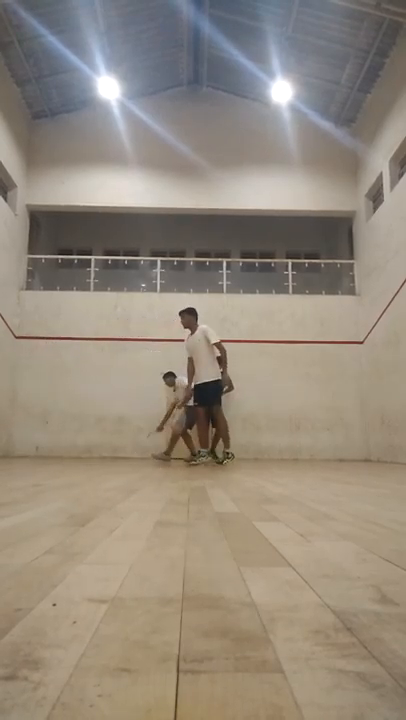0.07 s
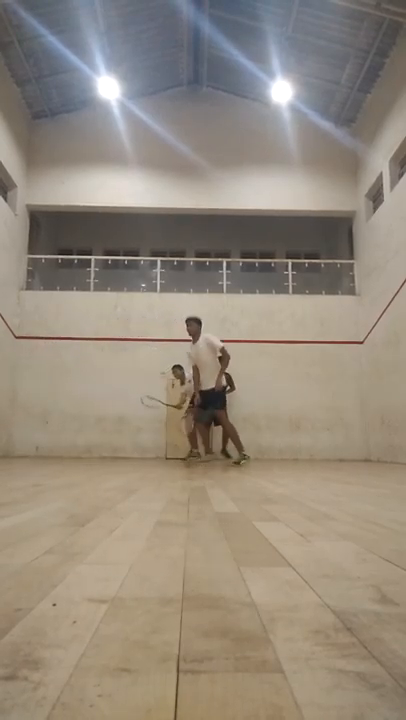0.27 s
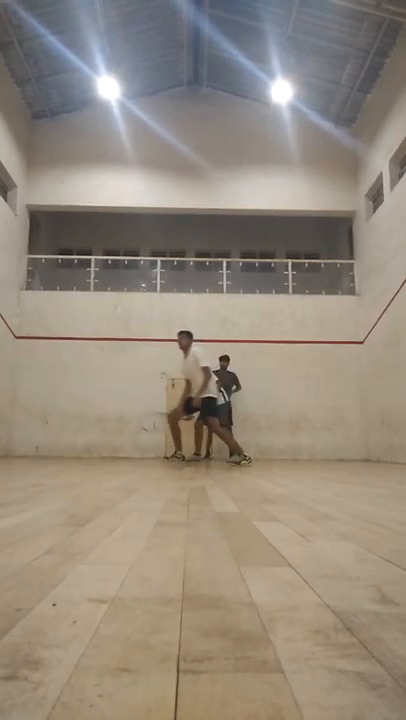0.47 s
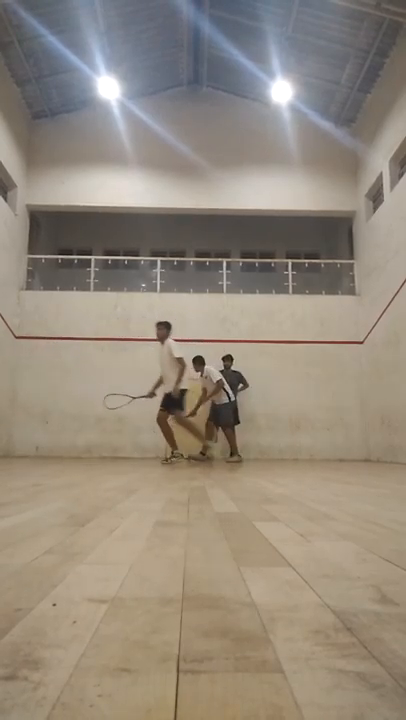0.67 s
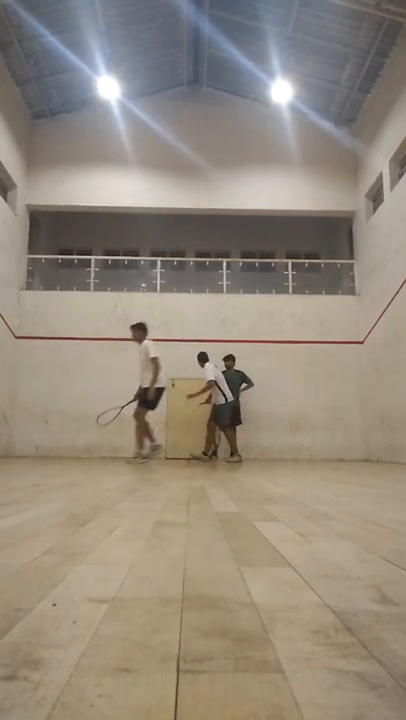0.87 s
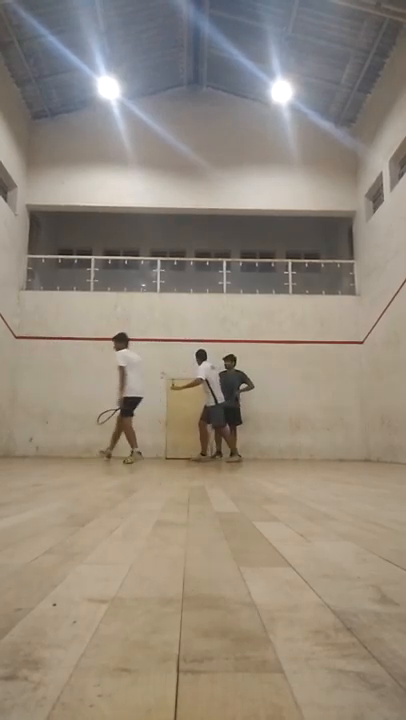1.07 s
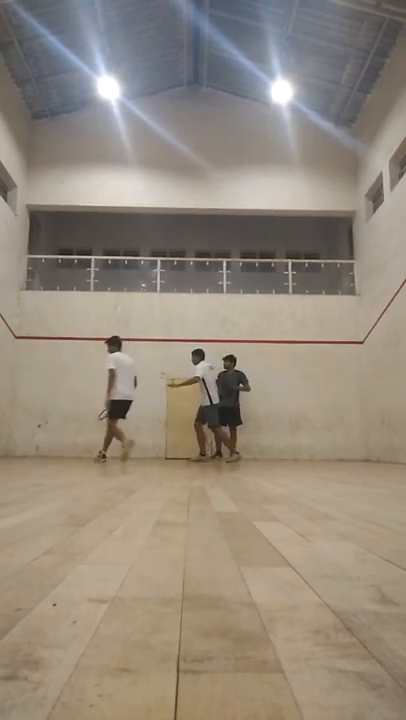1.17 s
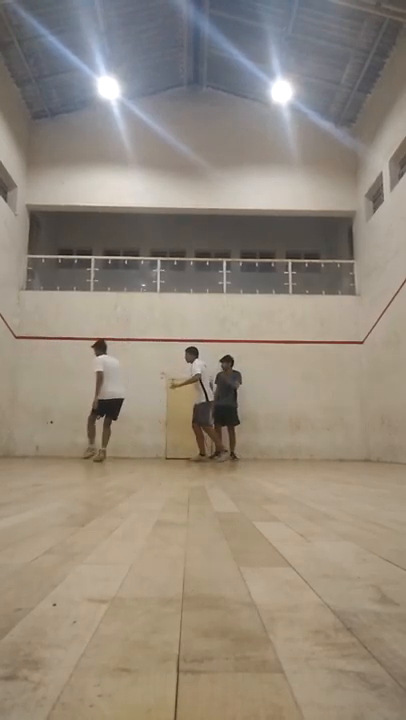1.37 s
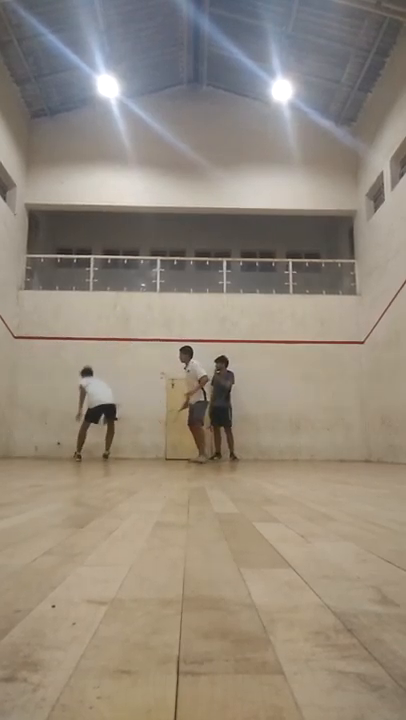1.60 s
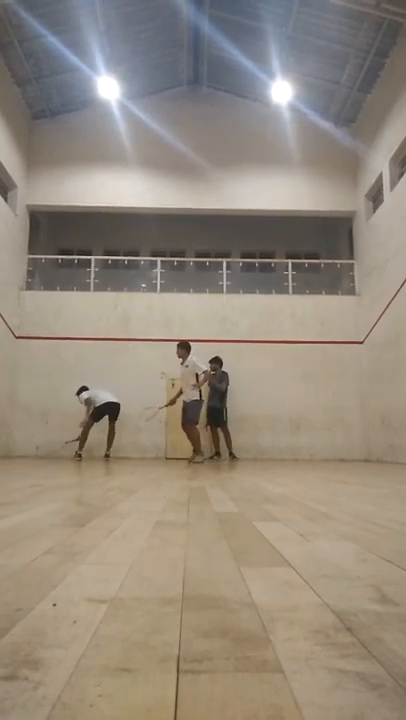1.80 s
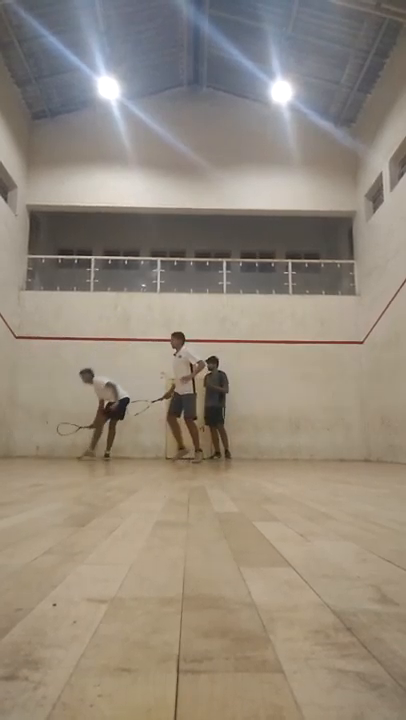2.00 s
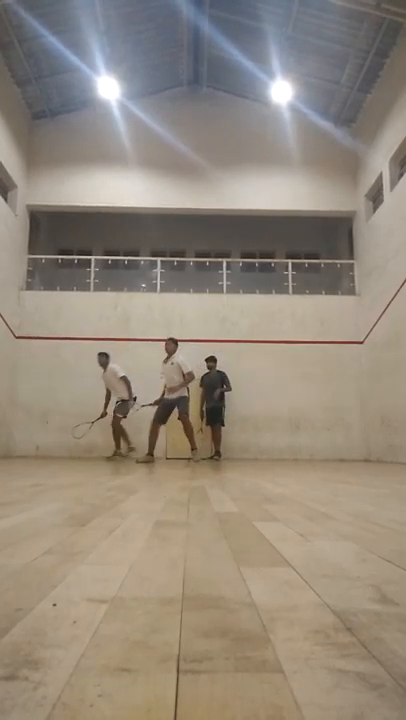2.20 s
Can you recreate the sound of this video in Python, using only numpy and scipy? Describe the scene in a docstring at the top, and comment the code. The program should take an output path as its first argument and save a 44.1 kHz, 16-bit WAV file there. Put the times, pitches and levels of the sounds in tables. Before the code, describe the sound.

A squash ball hitting a wall dominates, heard from floor level in a bare indoor court. At 0.2 seconds a distant racket strikes faintly; at 0.45 the ball slams the near wall, leaving a hollow echo for over a second. Soft, low footfalls thud on wooden boards from 0.8 seconds. Around 2 seconds a racket lightly taps, scrapes and knocks on the floor, with one sharp tick.

```python
"""A distant racket strikes a squash ball over the faint, dying echo of the previous shot.
The ball slams the near wall, flutters briefly and fills the bare, hard-walled court with a long echo.
The court rings hollow while the gain control ducks and recovers. Feet thud and scuff on sprung boards,
then a racket taps, scrapes and knocks on the floor. All is heard from floor level by the front wall."""
import sys
import numpy as np
from scipy import signal
from scipy.fft import rfft, irfft
from scipy.io import wavfile
from scipy.ndimage import uniform_filter1d

SR = 44100
rng = np.random.default_rng(int(sys.argv[2]) if len(sys.argv) > 2 else 0)


def wrap_up_sound(samples):
    """Save the sound to the file named by the first command line argument, as 16-bit audio."""
    columns = np.atleast_2d(samples).T
    # keep every value between -1 and 1, then stretch to whole-number steps
    tamed = np.clip(columns, -1, 1)
    steps = np.round(tamed * 32767).astype(np.int16)
    wavfile.write(sys.argv[1], SR, steps)


N = 99225
T = np.arange(N) / SR
HZ = np.maximum(np.arange(N // 2 + 1) * SR / N, 1)

# ball and wall at contact: f/Hz, t60/s, left level/dB, right level/dB
BALL_MODES = [(195, 0.027, -1.5, -15.5), (399, 0.011, -5.5, 10.5), (734, 0.014, -14.5, 10.5),
              (1303, 0.0096, -8.5, 8), (2350, 0.0071, -19, 1.5)]
# first returns off side walls, ceiling and rear wall (the strong one at 0.486 s): t/s, level/dB
EARLY_RETURNS = [(0.4657, -22.5), (0.468, -11.5), (0.4795, -17), (0.4863, -3.5), (0.49, -18), (0.505, -14),
                 (0.521, -13.5)]
# dull rebounds off side wall and floor: t/s, f/Hz, half-width/Hz, level/dB
REBOUNDS = [(.502, 560, 190, -15.5), (.547, 750, 201, -27), (0.569, 616, 228, -11.5)]
# swells of string and frame ring: t/s, f/Hz, half-width/Hz, level/dB, t60/s
STRING_SWELLS = [(.222, 393, 13.3, -29.5, 0.64), (.222, 1144, 33, -42.5, 1.0),
                 (.252, 1770, 21, -44.5, 0.45), (0.289, 1738, 38, -34.5, 0.5), (.317, 388, 25, -25.5, 0.26)]
# footfalls on sprung boards: t/s, f/Hz, level/dB, t60/s
FOOTFALLS = [(0.758, 66.3, -37, 0.55), (0.921, 148.3, -37, 0.95), (1.165, 85, -48, 0.59),
             (1.199, 193, -39, 0.51), (1.291, 129, -44, 0.48), (1.76, 96.4, -32.5, 0.3),
             (1.79, 231, -44.5, 0.4), (1.813, 134, -32, 0.17), (1.865, 76, -30.5, 0.24),
             (1.945, 70, -36, 0.19), (2.036, 85.4, -46, 0.4)]
# a faint shoe scuff, then the racket dragged on the floor: t/s, level/dB
SCRAPES = [(1.772, -67), (1.972, -42), (1.996, -42.5), (2.085, -43)]
# racket and ball knocking on the boards: t/s, level/dB
KNOCKS = [(2.033, -37), (2.085, -39)]

# spectral shapes of the contacts: f/Hz, relative level/dB
CRACK_SPECTRUM = [(60, -12), (300, 13), (1500, -9.5), (2600, -4), (4000, -9), (6500, 1), (8000, -12),
                  (12000, -41)]
SLAM_SPECTRUM = [(29, -59.5), (50, -8), (87, -22.5), (222, -9), (296, -3.5), (572, -3.5), (813, -1),
                 (1080, -21.5), (1440, -10.5), (1570, -14), (2040, -11), (2330, -14.5), (2780, -13.5),
                 (4410, -17), (5610, -15.5), (6830, -19), (7970, -53), (8700, -33.5), (9500, -44),
                 (12400, -93), (20900, -120)]
RACKET_SPECTRUM = [(60, -26), (110, -43), (180, -7.5), (300, -2.5), (400, -3.5), (540, -29.5), (700, -11.5),
                   (800, -11), (1000, -12), (1150, -6), (1380, -28), (1750, -25), (2050, -31),
                   (2450, -25.5), (3100, -28), (5600, -23.5), (7000, -31.5), (8000, -46.5), (9500, -52)]
SCRAPE_SPECTRUM = [(200, 7.5), (600, -0.5), (1100, -4), (1600, -11.5), (3000, -3), (4300, -4), (5500, 2),
                   (6700, 0), (8000, -22), (9500, -22)]
KNOCK_SPECTRUM = [(80, -45), (160, -16), (215, 1.5), (370, -2.5), (520, -25), (800, -54), (1100, -12.5),
                  (1400, -28), (4000, -47)]
TICK_SPECTRUM = [(300, -14), (1500, -11), (3000, -5), (6800, 1), (8000, -16), (12000, -30)]
# spectral shapes of the hall's hush and the previous shot's echo: f/Hz, relative level/dB
HUSH_SPECTRUM = [(30, -15.5), (70, -5), (110, -3.5), (220, -2.5), (450, -16), (800, -12.5), (1100, -10.5),
                 (2200, -13.5), (3200, -19.5), (4200, -26), (6100, -33), (7200, -43), (9000, -67.5)]
LAST_ECHO_SPECTRUM = [(100, -6.5), (600, 5.5), (1500, -0.5), (2500, -5), (4000, -6.5), (6300, 2),
                      (8000, -26.5)]

# court reverberation: f/Hz, t60/s
COURT_T60 = [(60, 0.45), (150, 0.97), (300, 0.94), (500, 1.414), (800, 1.407), (1800, 1.73), (3200, 1.32),
             (5500, 1.097), (9000, 0.8)]
# left-right likeness of diffuse sound: f/Hz, correlation
CORRELATION = [(50, 0.3), (200, 1), (450, 1), (800, 0.67), (1200, -0.4), (2000, -0.25), (4000, 0.11),
               (7000, -0.12)]
# left minus right of diffuse sound: f/Hz, level/dB
BALANCE = [(50, -7.5), (200, -7.5), (450, -8), (800, -10), (1200, -7), (2000, -8), (4000, -5.5), (6500, 0)]

WALL_S, HIT_DB = 0.4353, 9  # levels in slap, wall_hit and court_answer are relative to HIT_DB
FLUTTER_S, FLUTTER_STEP_DB = 0.0087, -2.5
CONTACT_RISE_S = 0.00051
LOW_CUT_HZ, TOP_HZ = 40, 9600
LIMIT_DB, RECOVER_DB_PER_S = -6.5, 24


def slap(start_s):
    """One slap of the ball: a crack and the short ring of ball and wall."""
    out = undb(-3) * pan(-3) * crack(start_s, CRACK_SPECTRUM, t60_s=0.005)
    for hz, t60_s, left_db, right_db in BALL_MODES:
        mode = ring(start_s, t60_s, CONTACT_RISE_S) * np.sin(2 * np.pi * hz * (T - start_s))
        out += undb([[left_db], [right_db]]) * mode
    return out


def wall_hit(thump_hz=88, floor_lag_s=0.0026):
    """The ball thumps the near wall; the floor doubles the slap, which repeats in a fast flutter."""
    scatter = diffuse(shape(SLAM_SPECTRUM)) * ring(WALL_S, t60_s=0.09, rise_s=CONTACT_RISE_S)
    thump = ring(WALL_S, t60_s=0.04, rise_s=CONTACT_RISE_S) * np.cos(2 * np.pi * thump_hz * (T - WALL_S))
    flutter = sum(undb(k * FLUTTER_STEP_DB) * slap(WALL_S + k * FLUTTER_S) for k in range(4))
    floor = slap(WALL_S + floor_lag_s)
    return undb(-21) * scatter + undb(-5) * pan(16) * thump + flutter + undb(-2.5) * floor


def court_answer(delay_s=0.0255):
    """After the hit: long echo, sharp first returns, dull rebounds, the court's swelling hollow ring."""
    echo_s = WALL_S + delay_s
    echo = court_echo(echo_s, SLAM_SPECTRUM, rise_s=0.0058)
    returns = sum(undb(db) * crack(start_s, CRACK_SPECTRUM, t60_s=0.0075)
                  for start_s, db in EARLY_RETURNS)
    rebounds = sum(undb(db) * band_noise(hz, half_width_hz) * ring(start_s, t60_s=0.16, rise_s=0.002)
                   for start_s, hz, half_width_hz, db in REBOUNDS)
    court_ring = band_noise(hz=775, half_width_hz=101) * ring(echo_s, t60_s=1.308, rise_s=0.29)
    return undb(-7) * echo + pan(-5) * returns + rebounds + undb(-8.5) * court_ring


def racket_stroke(echo_rise_s=0.0064):
    """The far racket meets the ball, heard mostly as echo; a shoe chirps; the end wall slaps back."""
    strings = sum(undb(db) * band_noise(hz, half_width_hz) * ring(start_s, t60_s, rise_s=0.0038)
                  for start_s, hz, half_width_hz, db, t60_s in STRING_SWELLS)
    squeak = band_noise(hz=5700, half_width_hz=450) * ring(0.246, t60_s=0.13)
    slapback = band_noise(hz=880, half_width_hz=150) * ring(0.348, t60_s=0.32, rise_s=echo_rise_s)
    direct = diffuse(shape(RACKET_SPECTRUM)) * ring(0.2222, t60_s=0.04, rise_s=CONTACT_RISE_S)
    echo = court_echo(0.2215, RACKET_SPECTRUM, echo_rise_s)
    return undb(-27) * direct + undb(-25.5) * echo + strings + undb(-34) * squeak + undb(-28.5) * slapback


def footsteps():
    """Each footfall rings the sprung floor and leaves a low boom in the hall."""
    out = 0
    for start_s, hz, db, t60_s in FOOTFALLS:
        board = pan(-7) * np.sin(2 * np.pi * hz * (T - start_s))
        boom = undb(-4) * band_noise(hz, half_width_hz=hz / 3)
        out += undb(db) * (board + boom) * ring(start_s, t60_s, rise_s=0.01)
    return out


def ball_pick_up():
    """A shoe scuffs; a racket taps and scrapes after the ball, with hollow knocks and one sharp tick."""
    tap = band_noise(hz=3300, half_width_hz=820) * ring(1.978, t60_s=0.05, rise_s=0.0019)
    scrapes = sum(undb(db) * court_echo(start_s, SCRAPE_SPECTRUM, rise_s=0.0023) for start_s, db in SCRAPES)
    knocks = sum(undb(db) * court_echo(start_s, KNOCK_SPECTRUM, rise_s=0.015) for start_s, db in KNOCKS)
    tick = crack(2.0812, TICK_SPECTRUM, t60_s=0.004)
    return undb(-36.5) * tap + scrapes + knocks + undb(-22.5) * tick


def background():
    """The previous shot's echo fades under the steady hush of the hall."""
    last_echo = diffuse(shape(LAST_ECHO_SPECTRUM)) * ring(0, t60_s=6.0)
    hush = diffuse(shape(HUSH_SPECTRUM))
    return undb(-65.5) * last_echo + undb(-55) * hush


def court_echo(start_s, spectrum, rise_s, merge_s=0.14):
    """Echo of one blow: separate reflections merge into a wash; each octave dies at its own rate."""
    spread = 0.53 * np.exp(-np.maximum(T - start_s, 0) / merge_s)
    sizes = np.repeat(rng.standard_normal(N // 16 + 1), 16)[:N]  # one reflection per 16 samples
    grain = np.exp(spread * sizes / 2 - spread ** 2 / 4)
    wash = rfft(diffuse(shape(spectrum), grain))
    out = 0
    for hz in 50 * 2.0 ** np.arange(9):
        octave = np.maximum(1 - abs(np.log2(HZ / hz)), 0)
        out += irfft(wash * octave, N) * ring(start_s, curve(COURT_T60, hz), rise_s)
    return out


def crack(start_s, spectrum, t60_s):
    """Hard contact: a brief noise burst, scaled to the energy of its envelope."""
    envelope = ring(start_s, t60_s)
    burst = irfft(rfft(rng.standard_normal((2, N)) * envelope) * shape(spectrum), N)
    return burst * np.sqrt(np.sum(envelope ** 2) / np.sum(burst ** 2, axis=1, keepdims=True))


def diffuse(colour, grain=1):
    """Diffuse noise at two microphones; their mean has unit level when grain is 1."""
    mid, side = rfft(rng.standard_normal((2, N)) * grain)
    correlation = np.clip(curve(CORRELATION), -0.99, 0.99)
    mid *= np.sqrt((1 + correlation) / 2)
    side *= np.sqrt((1 - correlation) / 2)
    left, right = undb(curve(BALANCE) / 2), undb(-curve(BALANCE) / 2)
    mono_gain = np.sqrt(left ** 2 + right ** 2 + 2 * correlation * left * right) / 2
    pair = np.array([left * (mid + side), right * (mid - side)]) / mono_gain
    return irfft(pair * colour / np.sqrt(np.mean(colour ** 2)), N)


def band_noise(hz, half_width_hz):
    """Diffuse noise through one resonance."""
    return diffuse(1 / (1 + ((HZ - hz) / half_width_hz) ** 2))


def ring(start_s, t60_s, rise_s=0):
    """Envelope: a rise with time constant rise_s and an exponential fall."""
    age_s = np.maximum(T - start_s, 0)
    attack = 1 - np.exp(-age_s / max(rise_s, 1 / SR))
    return attack * np.exp(-np.log(1000) * age_s / t60_s)


def curve(table, hz=HZ):
    """Table value on a log-frequency axis."""
    table_hz, values = np.array(table, float).T
    return np.interp(np.log(hz), np.log(table_hz), values)


def shape(spectrum):
    """Gain per frequency bin from a dB table."""
    return undb(curve(spectrum))


def pan(db):
    """Channel gains for a left-minus-right level."""
    return undb(np.array([[db], [-db]]) / 2)


def undb(db):
    """Decibels to gain."""
    return 10 ** (np.asarray(db) / 20)


def scene():
    """Stroke, wall hit and players in the hall."""
    stroke = racket_stroke()
    hit = undb(HIT_DB) * (wall_hit() + court_answer())
    return stroke + hit + footsteps() + ball_pick_up() + background()


def record(dry):
    """Bass cut; gain control ducks at once and recovers steadily; peaks clip; treble cut."""
    sound = signal.sosfilt(signal.butter(2, LOW_CUT_HZ, "high", fs=SR, output="sos"), dry)
    power = uniform_filter1d(np.max(sound ** 2, axis=0), size=96)
    over_db = np.maximum(10 * np.log10(np.maximum(power, 1e-12)) - LIMIT_DB, 0)
    recovery_db = RECOVER_DB_PER_S * T
    duck_db = np.maximum.accumulate(over_db + recovery_db) - recovery_db
    clipped = np.clip(sound * undb(-duck_db), -1, 1)
    return signal.sosfilt(signal.ellip(8, 0.2, 70, TOP_HZ, fs=SR, output="sos"), clipped)


dry = scene()
out = record(dry)
wrap_up_sound(out)
```